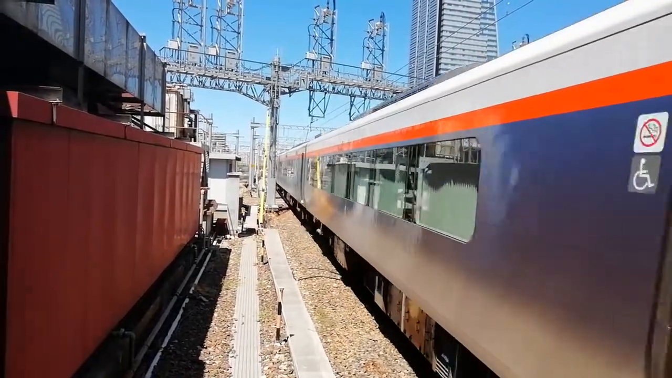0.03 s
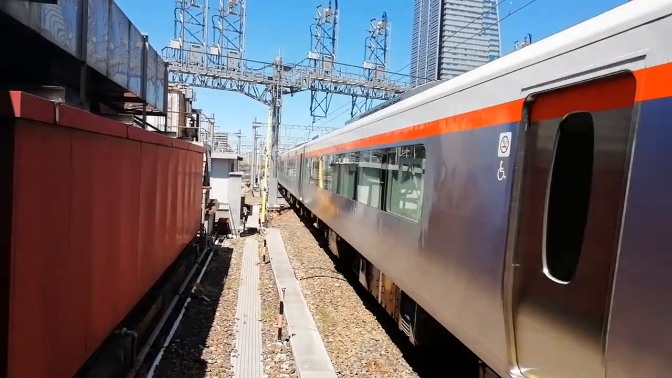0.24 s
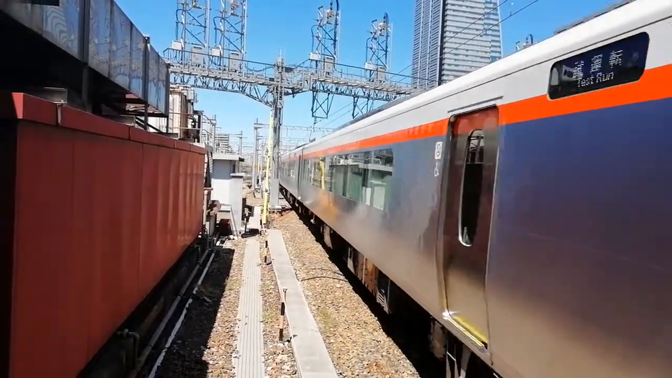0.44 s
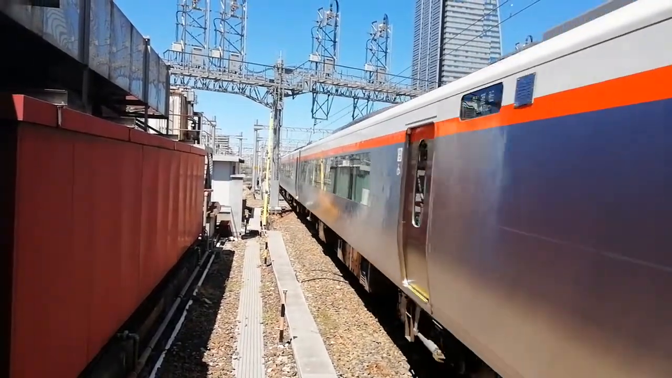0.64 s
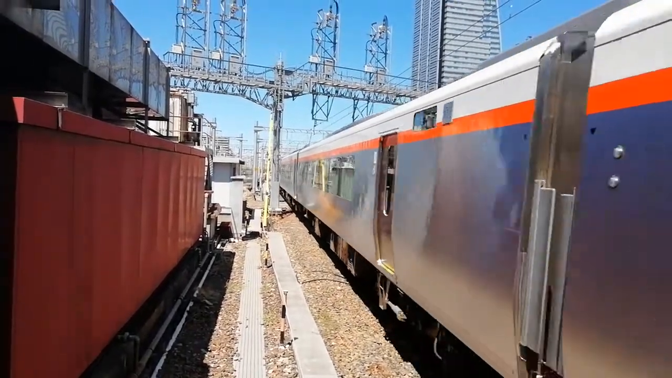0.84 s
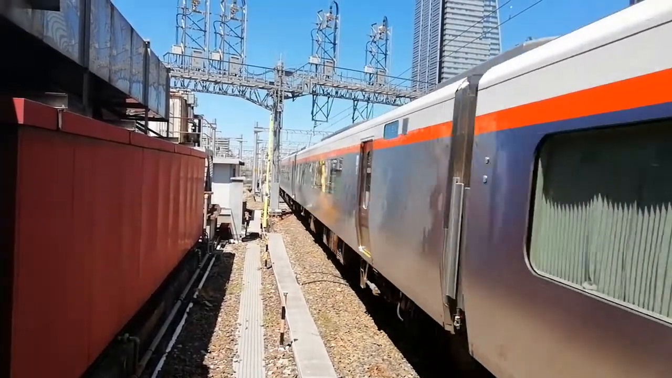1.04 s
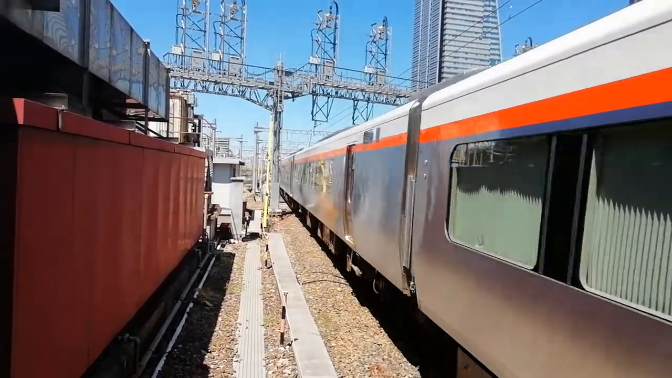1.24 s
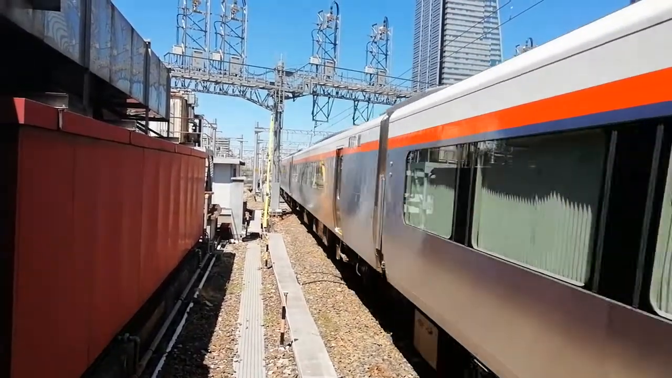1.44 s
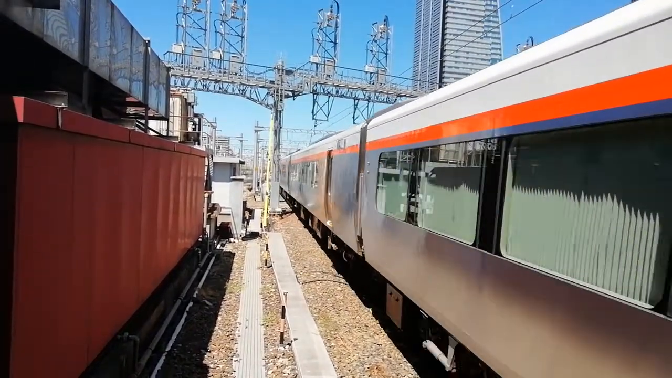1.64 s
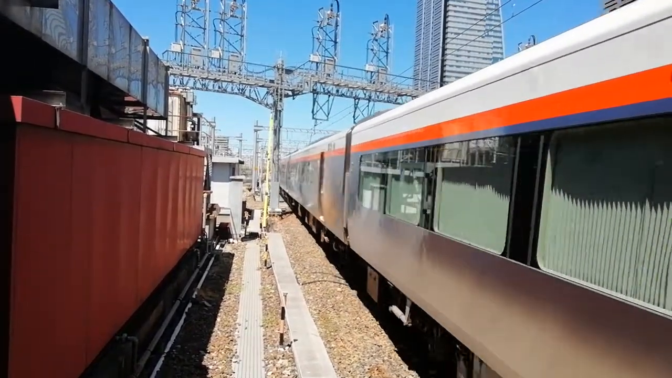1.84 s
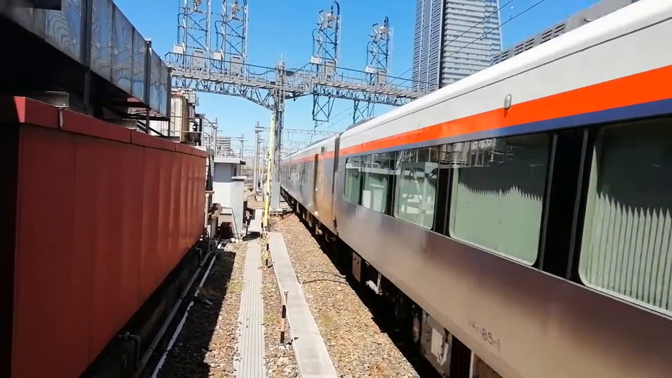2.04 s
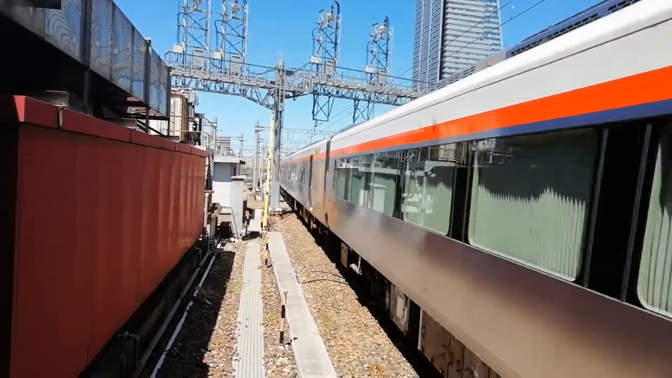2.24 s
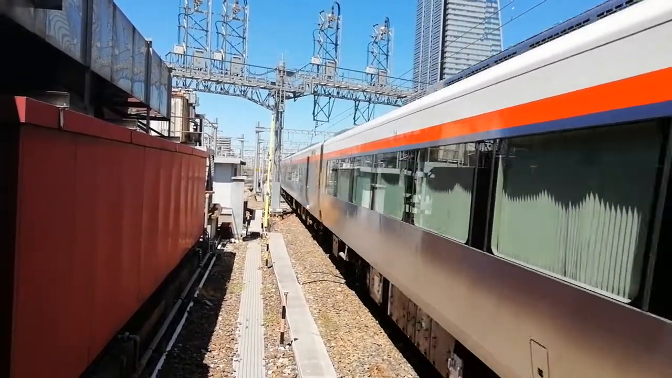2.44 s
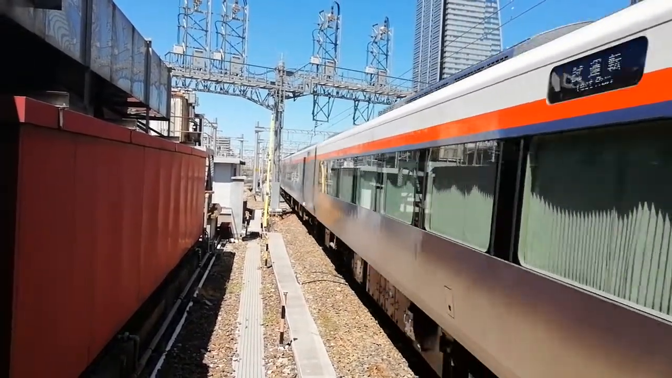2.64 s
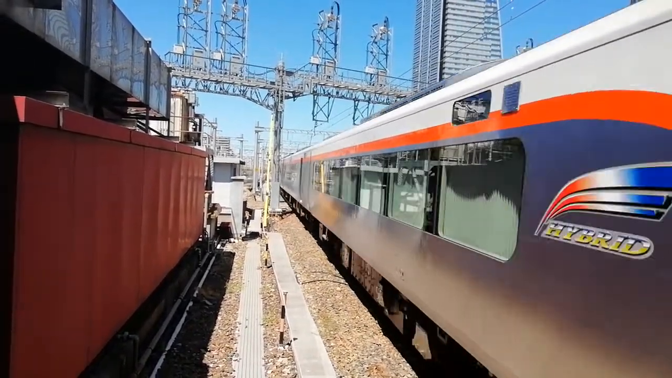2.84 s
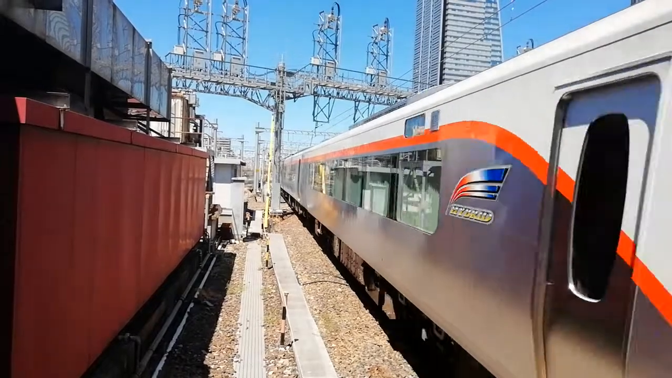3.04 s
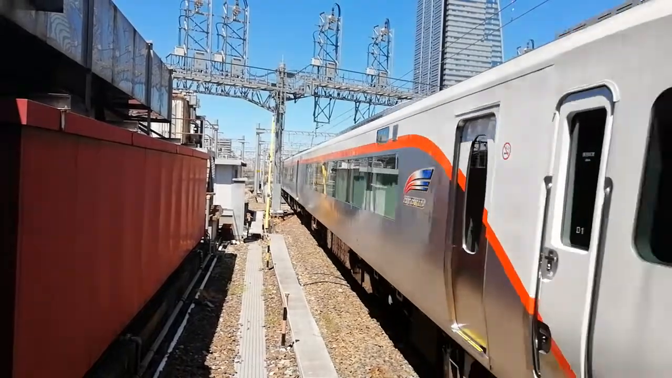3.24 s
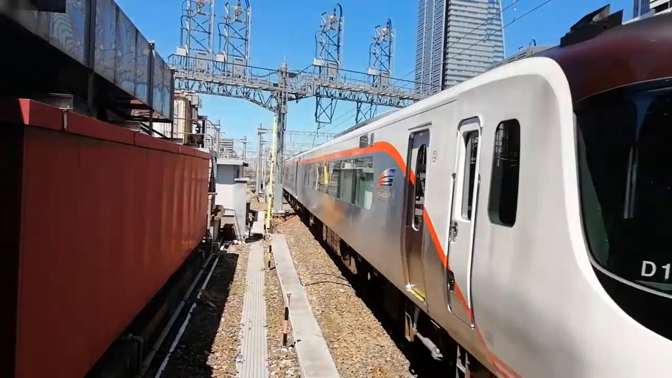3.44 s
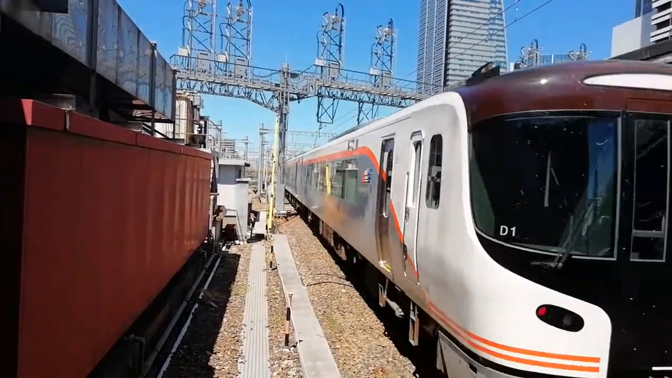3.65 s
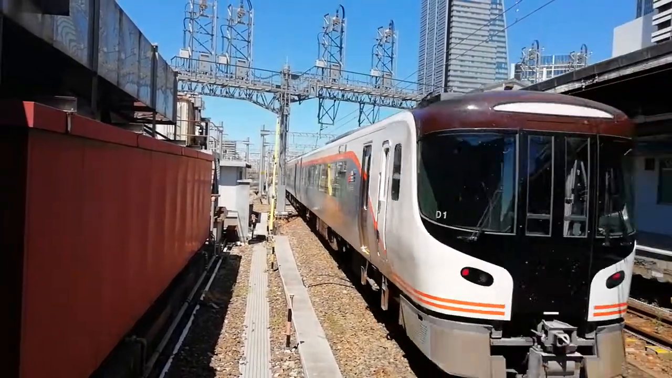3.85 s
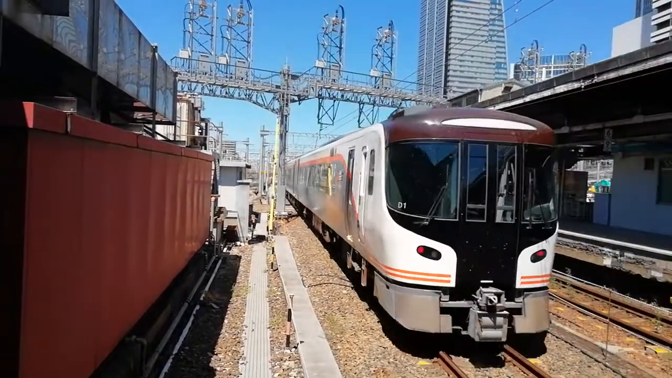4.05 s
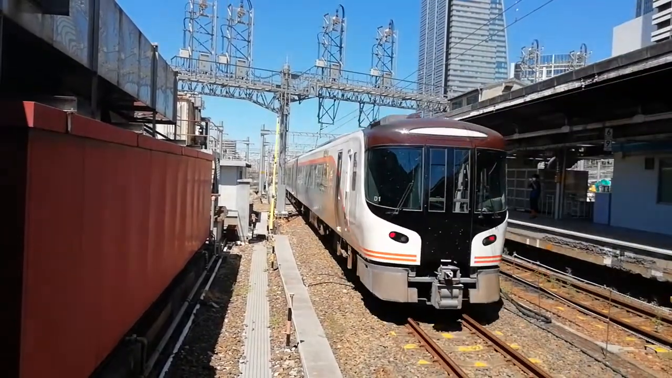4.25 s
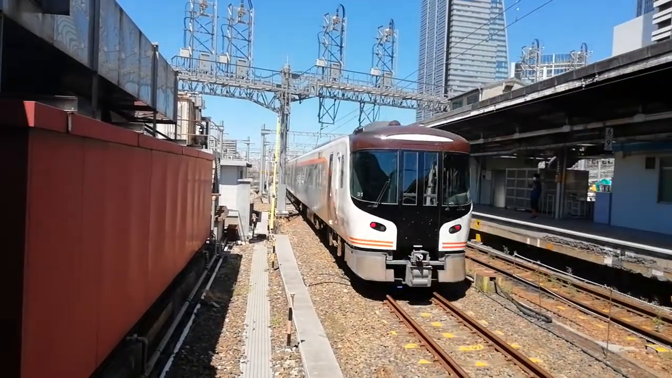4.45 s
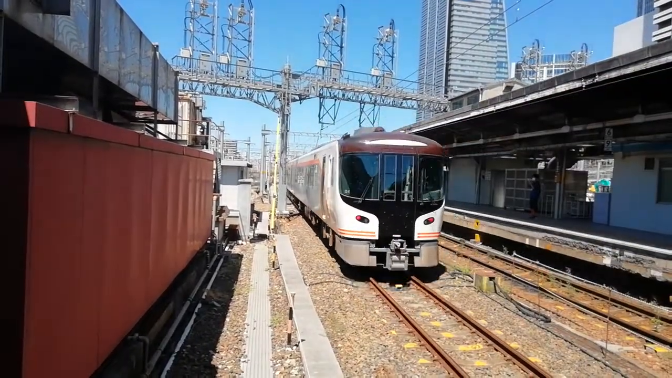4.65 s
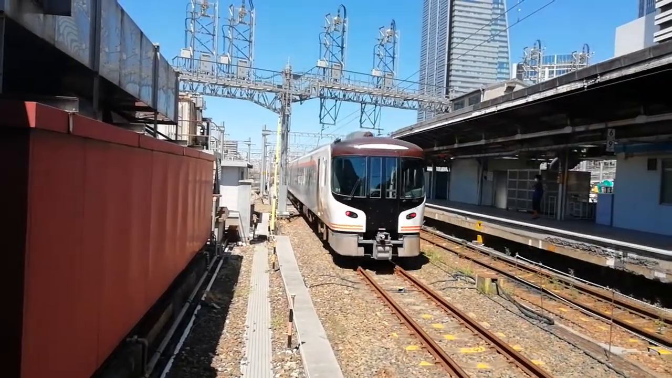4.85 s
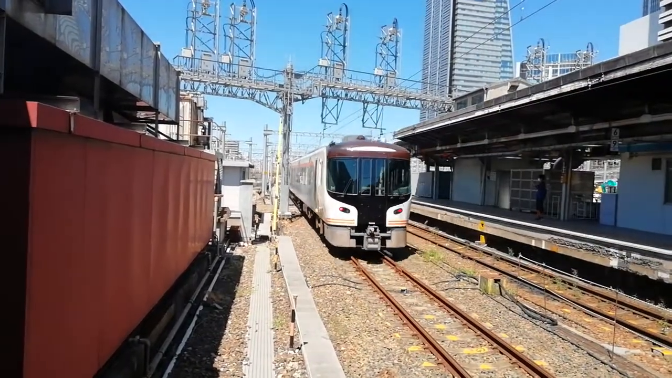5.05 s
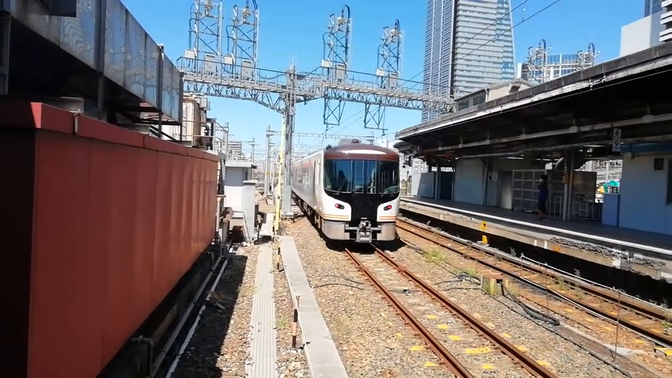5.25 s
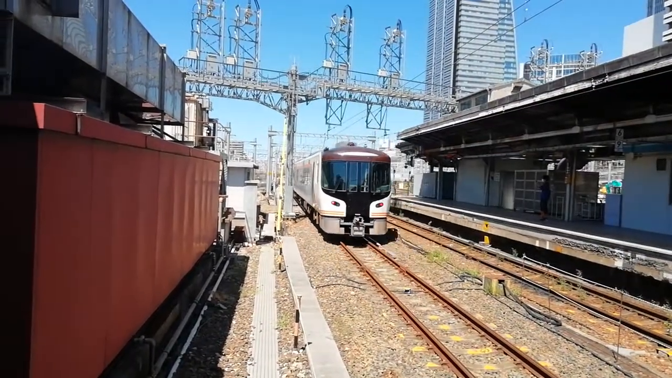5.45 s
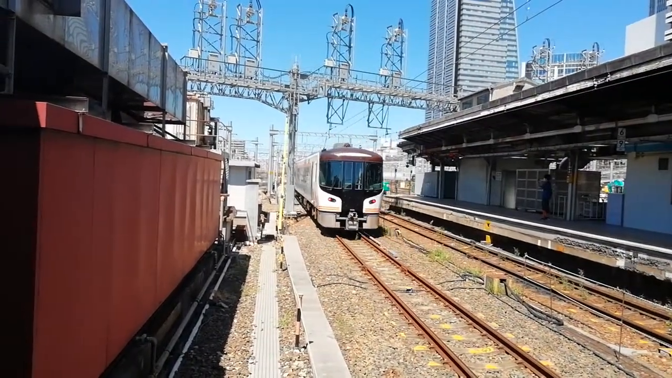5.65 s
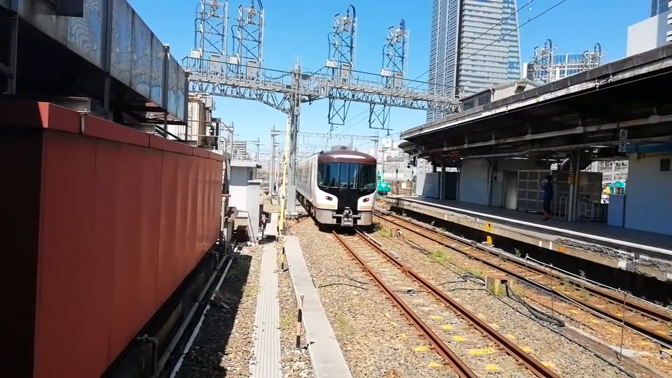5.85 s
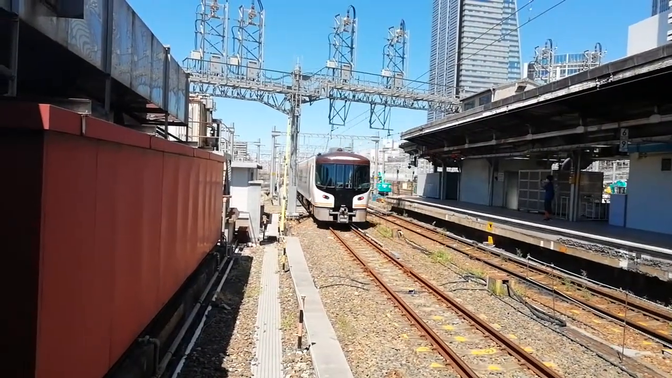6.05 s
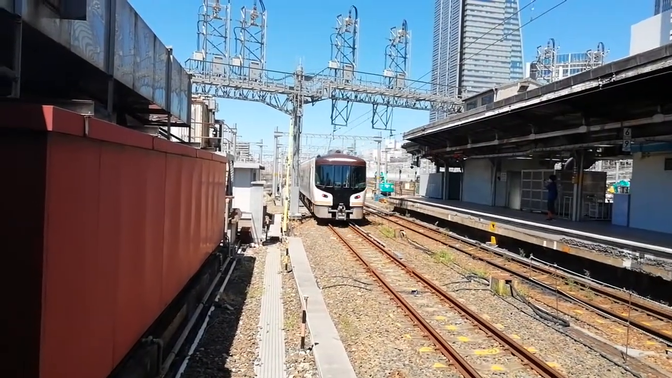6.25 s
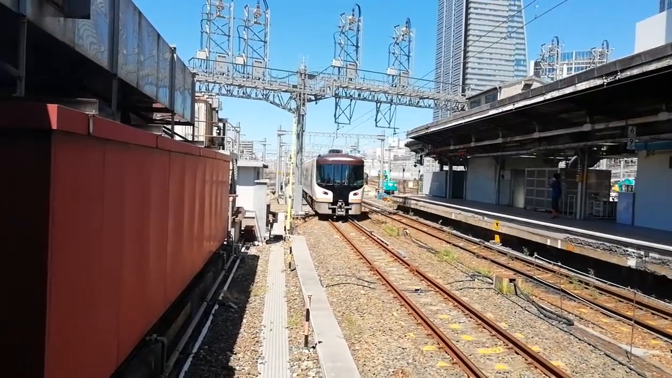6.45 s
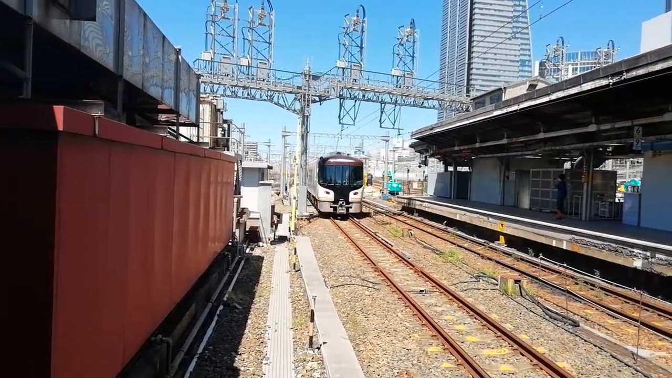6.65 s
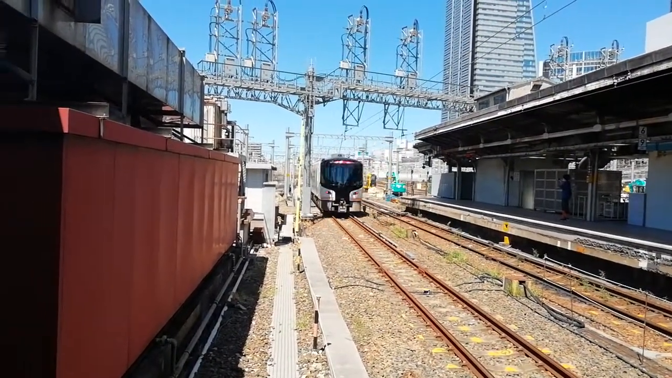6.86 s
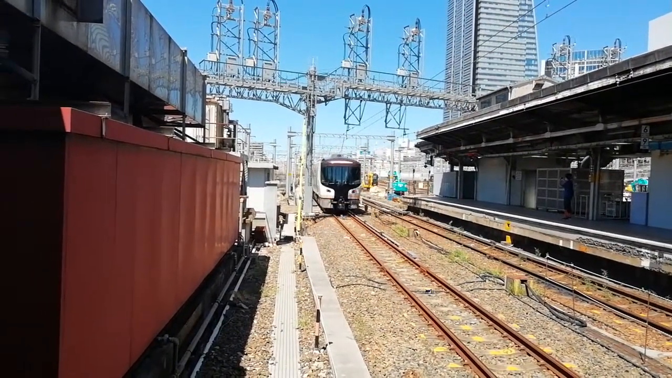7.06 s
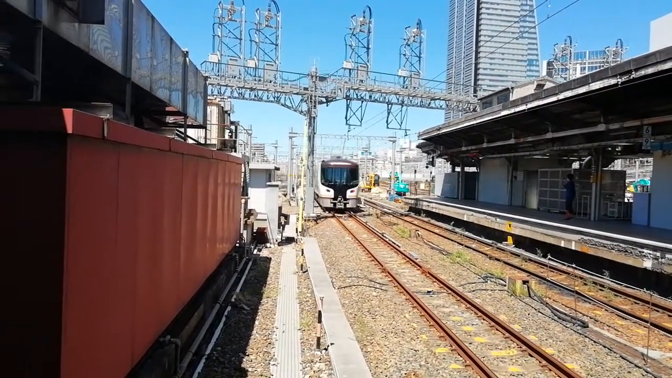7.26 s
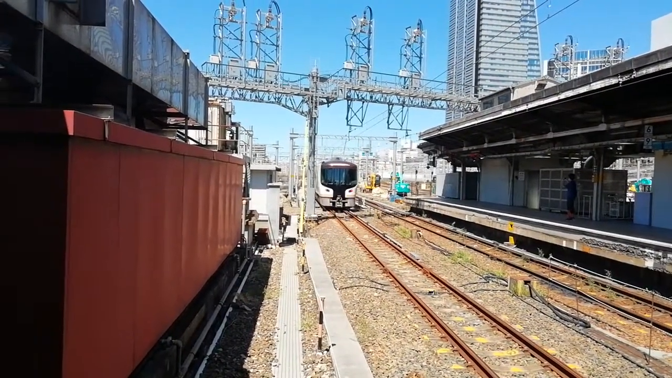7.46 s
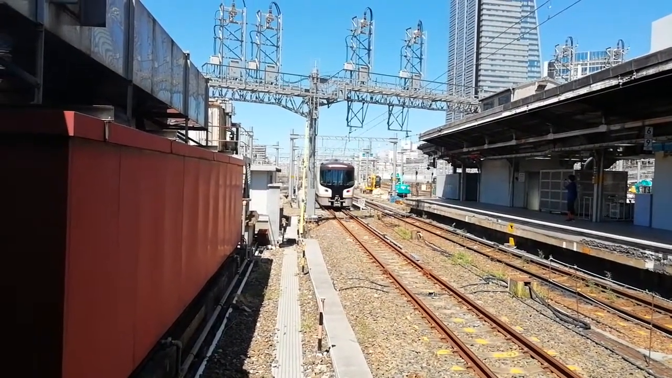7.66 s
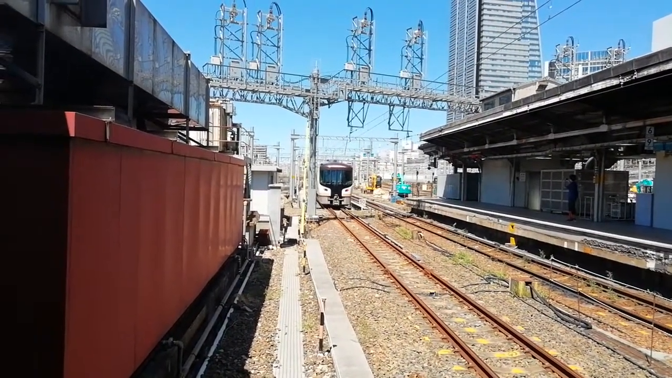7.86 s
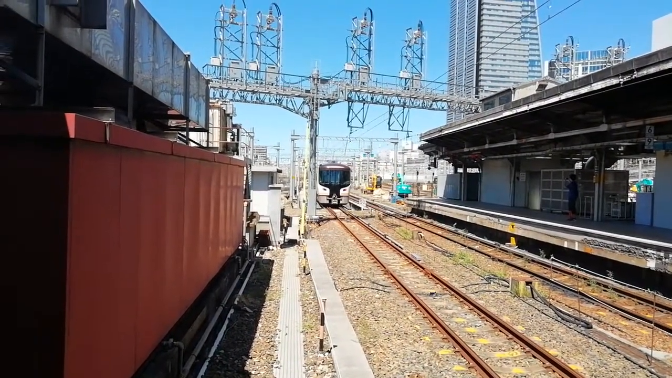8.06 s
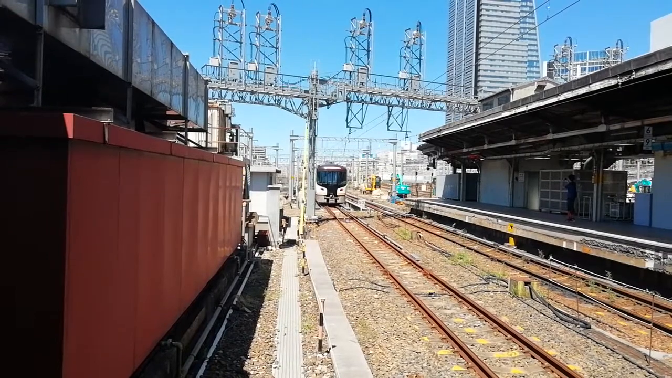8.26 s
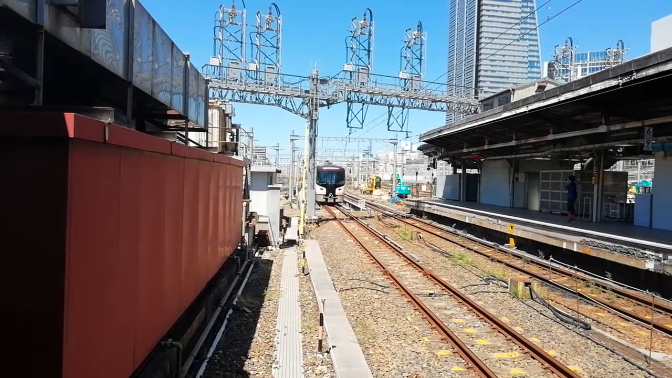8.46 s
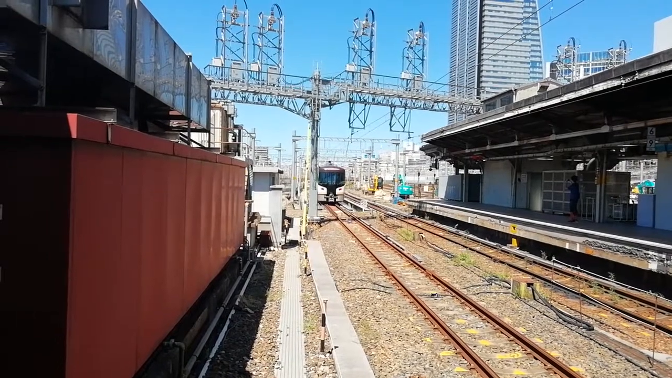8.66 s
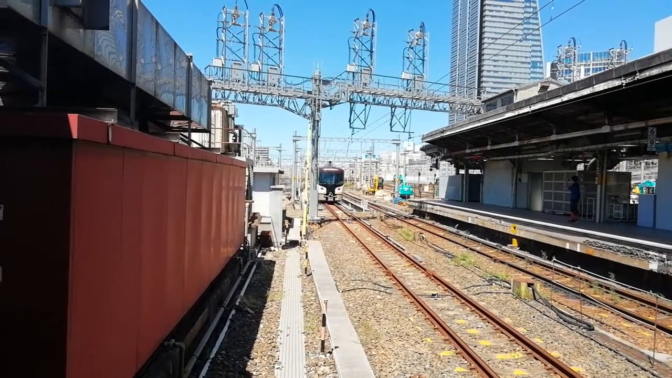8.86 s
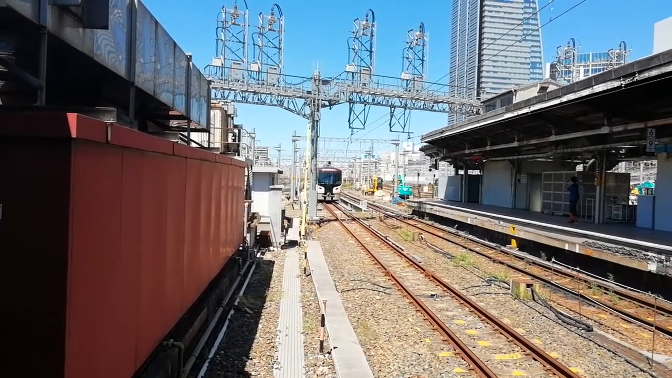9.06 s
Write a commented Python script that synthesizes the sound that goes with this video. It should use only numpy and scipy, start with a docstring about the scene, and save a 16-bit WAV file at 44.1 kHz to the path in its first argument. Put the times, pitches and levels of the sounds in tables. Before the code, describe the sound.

Beside an open-air station track, a departing train is already alongside: deep diesel drone, bright hissing outlets, rushing air, rolling wheels and a faint electric whine swell and shift. It then draws away, the hiss fading fastest. Knocks clank softly, later a distant puff and thin squeal sound, and engines pick up slightly far off. Close handheld stereo microphones, slightly coloured treble.

```python
"""The drone of a diesel hybrid railcar is heard first, as it leaves a station close by and draws away.
Its engines are sums of steady tones and throbbing noise; the fans, air, wheels and whine are shaped noise.
Each part swells as it goes by. Rail knocks, a puff of air and a thin wheel squeal (a sine) follow.
Distant traffic and the hums of the station stay behind. Two small microphone ports colour the sound."""
import sys
import numpy as np
from scipy import signal
from scipy.fft import rfft, irfft, next_fast_len
from scipy.io import wavfile
from scipy.ndimage import map_coordinates

SR = 44100
rng = np.random.default_rng(int(sys.argv[2]) if len(sys.argv) > 2 else 0)


def log_audio(samples):
    """Write samples as a 16-bit WAV file to the path given in sys.argv[1]."""
    # one column per channel
    frames = np.atleast_2d(samples).T
    # limit to full scale, then quantise
    limited = np.clip(frames, -1, 1)
    pcm = np.round(limited * 32767).astype(np.int16)
    wavfile.write(sys.argv[1], SR, pcm)


N = 401751
T = np.arange(N) / SR   # time of every sample, seconds
SIZE = next_fast_len(N)
FREQS = np.maximum(np.fft.rfftfreq(SIZE, 1 / SR), 1)   # Hz

SPEED_M_PER_S = 8.3
LAST_BOGIE_S = 3.05   # the underfloor gear has gone by
LAST_CAR_S, SPREAD_M = 3.56, 11.27   # the train starts to fade; length of train heard at once
ENGINE_DISTANCE_M = 2.26   # from the listener when abreast


# Engine firing rate, bent by the Doppler shift going by and picking up far off: (time [s], rate [Hz])
FIRING_RATE = [(0, 80.65), (1.9, 81.13), (2.85, 81.94), (3.45, 79.8), (4.4, 79.9), (5.8, 79.06),
               (7.6, 79.57), (8.3, 80.9), (9.11, 83.8)]
# The exhaust's firing tone, as the engines' drones add and cancel: (time [s], level before trim [dB])
FIRING_TONE = [(0.0, -27.5), (0.6, -21.5), (1.0, -23), (1.6, -19.5), (2.35, -28.5), (2.62, -29.5),
               (2.7, -22.5), (3.42, -17.5), (4.0, -28.5), (4.3, -42), (4.45, -33), (4.55, -36),
               (4.68, -27.5), (4.76, -25), (4.87, -39.5), (6.01, -36), (7.43, -38), (7.48, -41.5),
               (8.01, -51), (8.16, -44), (9.11, -41.5)]
# The tone one octave higher: (time [s], level before trim [dB])
FIRING_OCTAVE = [(0.0, -34), (0.11, -26.5), (0.18, -33), (0.35, -29), (0.56, -50), (0.84, -28), (0.95, -39),
                 (1.03, -31), (1.36, -25), (1.58, -25), (1.63, -33), (1.83, -20.5), (1.95, -21.5),
                 (2.12, -29), (2.17, -41), (2.24, -28.5), (2.35, -31.5), (2.72, -17.5), (3.45, -23.5),
                 (3.68, -34.5), (3.81, -31.5), (4.45, -39.5), (5.6, -55.5), (6.0, -35), (6.28, -36),
                 (6.6, -48.5), (7.4, -42), (7.9, -51.5)]
# Stronger tones of the engine and its geared helpers:
# (multiple of the firing rate, level against the engine level [dB])
ENGINE_ORDERS = [(3 / 2, -12.5), (2.2, -14), (7 / 2, -17), (5.1, -17.5)]
# Spectrum shape of the engine rumble: (frequency [Hz], relative level per Hz [dB])
RUMBLE_SPECTRUM = [(20, -28), (45, -18), (65, -2.5), (105, 7.5), (140, 4), (190, 5.5), (240, 2.5),
                   (285, -5.5), (335, -6.5), (450, -12.5), (900, -31)]


def engines(tone_db=0.34, octave_db=-0.7, growl_db=-4.0, rumble_db=-1.0, throb=0.3, lope=0.079,
            waver_db=0.76, order_waver_db=2, lag_ms=0.23):
    """Firing tone and octave, the growl of unequal cylinders, and a rumble that throbs with each firing."""
    firing_hz, = in_time(FIRING_RATE)
    first_db, = in_time(FIRING_TONE)
    second_db, = in_time(FIRING_OCTAVE)
    phase = 2 * np.pi * np.cumsum(firing_hz) / SR

    # while the cars are alongside on the right, their sound reaches the left port later
    lag = 2 * np.pi * firing_hz * lag_ms / 1000 * swell(1.5, 1.6)
    heard = phase - lag * np.array([[1], [0]])

    tone = from_db(first_db + tone_db + waver_db * drift(20)) * np.cos(heard)
    octave_level = from_db(second_db + octave_db + waver_db * drift(18))
    octave = octave_level * np.cos(2 * heard + 0.38 * drift(1.93))
    # uneven once per crank turn, which is three firings
    unevenness = 1 + lope * drift(3.1) * np.cos(phase / 3 + drift(1.96))
    drone = (tone - octave) * unevenness

    orders = sum(from_db(db + order_waver_db * drift(4)) * np.cos(multiple * heard + drift(2.5))
                 for multiple, db in ENGINE_ORDERS)
    rumble = from_db(rumble_db) * broad_noise(RUMBLE_SPECTRUM, flutter_db=1.5, rate=14)
    rumble = rumble * (1 + throb * np.cos(phase))
    block = np.sqrt(2) * orders + from_db(growl_db) * growl(phase) + rumble
    return np.sqrt(2) * drone + engine_level() * block


def growl(phase, count=30, step=10):
    """Six unequal cylinders repeat every sixth firing: close tones that beat, like several similar engines."""
    sixths = np.arange(count) + 7
    gains = from_db(np.interp(sixths * FIRING_RATE[0][1] / 6, FREQS, over_hz(RUMBLE_SPECTRUM)))
    # computed at every tenth sample; whole multiples of the firing rate are left out
    lines = sum(gain * drift(3)[::step] * np.cos(k / 6 * phase[::step] + drift(2)[::step])
                for k, gain in zip(sixths, gains) if k % 6)
    return rms_one(signal.resample_poly(lines, step, 1)[:N])


# Engines going by: (time [s], level before the layer trims [dB])
ENGINES_ABREAST = [(0.15, -37.5), (1.55, -29.5), (2.87, -29)]


def engine_level(train_db=-44.0, fall=0.17):
    """Each engine swells as it goes by, over the rumble of the whole train."""
    near = [from_db(db) * passing(s, ENGINE_DISTANCE_M) for s, db in ENGINES_ABREAST]
    return together(near + [from_db(train_db) * receding(fall)])


# Resonances of the whole train's fan roar, with a steady low auxiliary tone at 282.5 Hz: # (frequency [Hz],
# width [Hz], relative level [dB])
TRAIN_ROAR_MODES = [(282.5, 16, -1), (438, 49, 4), (472, 21, 0.5)]
# Fan outlets going by: (time [s], half length [s], frequency [Hz], width [Hz], level [dB])
FAN_OUTLETS = [(1.3, 0.26, 463, 70, -38), (2.362, 0.14, 420, 27.78, -29), (2.379, 0.32, 483, 80, -30.5),
               (3.24, 0.13, 452, 64.81, -31.5)]
# Tones and resonances heard only in front of the fan grille:
# (frequency [Hz], width [Hz], level before the left-right balance [dB])
GRILLE_TONES = [(600, 17, -40.5), (704, 12, -46), (600, 150, -38), (1640, 430, -42.5), (2400, 68, -49),
                (2600, 670, -44.5)]


def fans(train_db=-39.5, fall=1.7, grille_s=2.12, grille_half_s=0.54, lag_ms=0.71):
    """Cooling air roars in its housings; each outlet has its own pitch and the open grille adds brighter tones."""
    housing = rms_one(resonances(TRAIN_ROAR_MODES))
    # close by the sound comes from the right, far off from all round
    abreast = swell(grille_s, 1.5)
    roar = np.sqrt(abreast) * noise(housing, lag_ms) + 0.9 * np.sqrt(1 - abreast) * noise(housing)
    outlets = sum(from_db(db) * swell(s, half) * doppler(noise(resonance(hz, width), lag_ms), s)
                  for s, half, hz, width, db in FAN_OUTLETS)
    grille = swell(grille_s, grille_half_s) * doppler(noise(resonances(GRILLE_TONES), lag_ms), grille_s)
    return from_db(train_db) * receding(fall) * roar + outlets + grille * from_db([[-3], [1]])


# Spectrum shape of the rolling wheels: (frequency [Hz], relative level per Hz [dB])
ROLL_SPECTRUM = [(200, -2.5), (400, 5), (560, 0.5), (700, -2), (850, -1), (1050, -1), (1200, -0.5),
                 (1400, 2), (1750, -3.5), (2300, -9.5), (4000, -7.5), (9000, -37)]
# Spectrum shape of the air under the floor: (frequency [Hz], relative level per Hz [dB])
RUSH_SPECTRUM = [(900, -18), (1600, -15), (2200, -8.5), (2600, 0.5), (3700, 2), (5000, 2.5), (7000, -6.5),
                 (10000, -12.5), (15500, -26)]
# Whine of the power electronics:
# (frequency [Hz], width [Hz], level against the air rush, before trim [dB])
WHINE_TONES = [(2390, 44, -21), (4090, 60, -24)]


def running_gear(roll_db=-37, roll_fall=0.45, bogie_db=-43, bogie_s=2.6, rush_db=-34.0, rush_fall=0.87,
                 alongside_db=2.5, whine_db=4.0):
    """Wheels roll, swelling briefly with one bogie; air rushes under the floor and the electronics whine."""
    # a boost that eases away as the last bogie leaves
    gone = np.tanh(SPEED_M_PER_S * (T - LAST_BOGIE_S) / ENGINE_DISTANCE_M)
    beside = from_db(alongside_db * (1 - gone) / 2)

    train_wheels = from_db(roll_db) * np.sqrt(beside) * receding(roll_fall)
    wheels = together([train_wheels, from_db(bogie_db) * swell(bogie_s, 0.092)])
    roll = wheels * broad_noise(ROLL_SPECTRUM, flutter_db=0.6, rate=16)
    rush = broad_noise(RUSH_SPECTRUM, flutter_db=0.7, rate=28)
    whine = from_db(whine_db + 1.2 * drift(9)) * noise(resonances(WHINE_TONES))
    return roll + from_db(rush_db) * beside * receding(rush_fall) * (rush + whine)


# Hissing air outlets going by: (time [s], half length [s], level [dB])
HISS_OUTLETS = [(0.0, 0.38, -24), (0.768, 0.52, -25.5), (2.45, 0.72, -33), (4.3, 0.31, -40.5)]
# Spectrum shape of the hiss: (frequency [Hz], relative level per Hz [dB])
HISS_SPECTRUM = [(2500, -12), (5000, -5), (6500, -1), (8000, 0.5), (11500, 2), (15500, -1.5)]


def air_hiss(train_db=-36.0, fall=1.39):
    """Turbulent air hisses as outlets go by; the hiss of the whole train fades quickly with distance."""
    near = [from_db(db) * swell(s, half) for s, half, db in HISS_OUTLETS]
    level = together(near + [from_db(train_db) * receding(fall)])
    return level * broad_noise(HISS_SPECTRUM, flutter_db=0.82, rate=38)


# Swells of air: (time [s], half length [s], frequency [Hz], width [Hz], level [dB])
AIR_RUSHES = [(2.599, 0.094, 12700, 8300, -29.5), (2.78, 0.31, 14000, 7000, -32.5),
              (2.62, 0.26, 3400, 1000, -37.5), (2.65, .3, 1440, 290, -48), (4.55, 0.75, 4000, 1600, -40),
              (4.4, 0.6, 1350, 320, -46), (8.3, 0.35, 2900, 1300, -48)]


def air_swells():
    """Bands of air noise swell past with the cars and in their wake; far off there is a faint rush."""
    return sum(from_db(db) * swell(s, half) * noise(resonance(hz, width))
               for s, half, hz, width, db in AIR_RUSHES)


# The whine flares up: (time [s], half length [s], level on the right [dB])
FLARES = [(1.84, 0.027, -39), (2.19, 0.05, -41.5), (2.5, .2, -44)]


def whine_flares(hz=2440, width_hz=42, left_db=-4):
    """The whine, a narrow band of noise, rings out briefly while the train is close."""
    level = sum(from_db(db) * swell(s, half) for s, half, db in FLARES)
    return level * noise(resonance(hz, width_hz), lag_ms=0.66) * from_db([[left_db], [0]])


# Low thrums: (time [s], half length [s], level [dB])
LOW_THRUMS = [(1.41, 0.041, -25), (1.72, 0.094, -28.5), (8.33, 0.035, -41.5), (8.75, 0.3, -44.5)]


def thrums(hz=194, width_hz=24):
    """A low thrum wells up as an engine goes by, and again as the engines pick up in the distance."""
    level = sum(from_db(db) * swell(s, half) for s, half, db in LOW_THRUMS)
    return level * noise(resonance(hz, width_hz))


# Wheel knocks on the rail, before the strike's shape and the clank's resonances:
# (time [s], thud level [dB], clank level [dB])
RAIL_KNOCKS = [(4.45, -32, -33), (4.51, -46, -35), (4.71, -34, -30.5), (7.40, -32, -55)]


def knocks(rise_s=0.0047, ring_s=0.049):
    """A wheel strikes a gap in the rail: a dull thud with a short clank."""
    thud, clank = np.zeros((2, N))
    for s, thud_db, clank_db in RAIL_KNOCKS:
        blow = strike(s, rise_s, ring_s)
        thud += from_db(thud_db) * blow
        clank += from_db(clank_db) * blow
    clank_modes = [(880, 270, -6.5), (1460, 340, -9.5)]   # (Hz, width Hz, dB)
    return thud * noise(resonance(130, 80)) + clank * noise(resonances(clank_modes))


def air_puff(s=7.632, rise_s=.008, fall_s=.036, hz=3850, width_hz=1400, db=-32):
    """Far off, a short puff of air starts sharply and dies away."""
    return from_db(db) * strike(s, rise_s, fall_s) * noise(resonance(hz, width_hz))


# A far wheel sings thinly on the curve: (time [s], length [s], peak level on the right before waver [dB])
WHEEL_SQUEALS = [(6.38, .17, -52), (7.61, .53, -49.3), (8.33, .05, -49.5)]


def squeal(hz=3225, waver_hz=4, waver_db=1.4, left_db=-8, attack_s=.04, release_s=.09):
    """One wheel mode, kept ringing unevenly while the flange rubs on the rail."""
    level = 0
    for s, length, db in WHEEL_SQUEALS:
        attack = np.clip((T - s) / attack_s, 0, 1)
        release = np.exp(-np.maximum(T - s - length, 0) / release_s)
        level = level + from_db(db) * attack * release
    phase = 2 * np.pi * np.cumsum(hz + waver_hz * drift(12)) / SR
    return level * from_db(waver_db * drift(14)) * np.sin(phase) * from_db([[left_db], [0]])


# Steady hums around the station: (frequency [Hz], width [Hz], level [dB], left minus right [dB])
STATION_HUMS = [(194.8, 5.3, -49.5, -3), (395, 16, -53, -3.5), (586, 24, -59, -0.5),
                (1035, 37, -56.5, -1.5), (1379, 9.2, -60, -6), (1945, 31, -59.5, 1)]
# Spectrum shape of distant town traffic: (frequency [Hz], relative level per Hz [dB])
TOWN_SPECTRUM = [(20, -25), (58, 13), (110, -18), (200, -0.5), (330, -9), (750, -11), (3000, -22.5),
                 (15500, -34)]


def station(town_db=-48):
    """Distant traffic and the faint steady hums of the surroundings, all made of shaped noise."""
    power = sum((from_db(db + pan_db / 2 * np.array([[1], [-1]])) * resonance(hz, width)) ** 2
                for hz, width, db, pan_db in STATION_HUMS)
    town = from_db(town_db) * broad_noise(TOWN_SPECTRUM, flutter_db=2.0, rate=7.2)
    return noise(np.sqrt(power)) + town


def receding(fall):
    """Gain of the whole train: steady while cars are alongside, then a power of the last car's distance."""
    gone_m = SPEED_M_PER_S * np.maximum(T - LAST_CAR_S, 0)
    return np.hypot(1, gone_m / SPREAD_M) ** -fall


def passing(s, distance_m):
    """Gain of a single source going by, inversely as its distance; 1 when abreast."""
    return 1 / np.hypot(1, SPEED_M_PER_S * (T - s) / distance_m)


def doppler(x, s):
    """A sound carried past the listener: delayed by its distance, so its pitch sags as it goes by."""
    path_m = np.hypot(ENGINE_DISTANCE_M, SPEED_M_PER_S * (T - s))
    return np.array([np.interp(T - path_m / 343, T, channel) for channel in x])   # sound goes 343 m/s


def swell(s, half_length):
    """Bell-shaped rise and fall around a moment."""
    return np.exp(-.5 * ((T - s) / half_length) ** 2)


def strike(s, rise_s, fall_s):
    """A quick rise from silence, then a dying away."""
    age = np.maximum(T - s, 0)
    return (1 - np.exp(-age / rise_s)) * np.exp(-age / fall_s)


def together(gains):
    """Unrelated sources add in power."""
    return np.sqrt(sum(gain ** 2 for gain in gains))


def from_db(db):
    """Decibels to gain."""
    return 10 ** (np.asarray(db) / 20)


def rms_one(x):
    """Scale to unit power."""
    return x / np.sqrt(np.mean(x ** 2) + 1e-20)


def in_time(rows):
    """Each column of a curve table at every sample."""
    s, *columns = np.transpose(rows)
    return [np.interp(T, s, column) for column in columns]


def over_hz(points):
    """A table joined by straight lines over log frequency."""
    hz, value = np.transpose(points)
    return np.interp(np.log(FREQS), np.log(hz), value)


def drift(rate):
    """Slow random wandering of spread 1, through `rate` random points a second."""
    knots = rng.standard_normal(4000)
    curve = map_coordinates(knots, [T[::100] * rate], order=3, mode="mirror")
    return rms_one(curve).repeat(100)[:N]


def resonance(hz, width_hz):
    """Gain of a steep-sided resonance, of unit power."""
    detuning = (FREQS ** 2 - hz ** 2) / (FREQS * width_hz * 1.5)
    return rms_one(1 / (1 + detuning ** 2))


def resonances(modes):
    """Gain of several resonances whose powers add."""
    return together([from_db(db) * resonance(hz, width) for hz, width, db in modes])


# Likeness of the two channels: (frequency [Hz], correlation [-1 to 1])
CHANNEL_LIKENESS = [(100, 0.98), (220, 0.91), (330, 0.8), (450, -0.035), (600, -0.64), (900, 0.19),
                    (1400, 0.14), (2000, -0.083), (2500, -0.38), (3500, 0.27), (4400, -0.3), (5400, 0.44),
                    (6400, -0.35), (7400, 0.26), (8500, -0.13), (12000, 0.073)]


def noise(gain, lag_ms=0):
    """Stereo noise of a given spectrum, alike in both ports in the bass; a source on the right lags on the left."""
    mid, side = rfft(rng.standard_normal((2, SIZE)))
    alike = np.clip(over_hz(CHANNEL_LIKENESS), -.995, .995)
    pair = np.sqrt((1 + alike) / 2) * mid + np.sqrt((1 - alike) / 2) * side * [[1], [-1]]
    if lag_ms:
        delay = np.exp(-2j * np.pi * FREQS * lag_ms / 1000 * [[1], [0]])   # left channel only
        pair = .5 * pair + np.sqrt(3 / 4) * mid * delay
    return irfft(pair * gain, SIZE)[:, :N]


def broad_noise(spectrum, flutter_db, rate):
    """Turbulent noise, of unit power before its level flutters a little."""
    return noise(rms_one(from_db(over_hz(spectrum)))) * from_db(flutter_db * drift(rate))


def scene():
    """The train and the station around it."""
    train = engines() + fans() + running_gear() + air_hiss() + air_swells()
    details = whine_flares() + thrums() + knocks() + air_puff() + squeal()
    return train + details + station()


# Microphone port responses, left then right: (frequency [Hz], gain [dB])
LEFT_RESPONSE = [(300, 0), (450, -1), (800, 4), (1500, -0.5), (2200, 4.5), (3000, -3), (4100, -4),
                 (5200, -7.5), (7500, -3), (9400, 0.5), (10500, 0.5), (11600, 3), (12800, -4),
                 (15500, -15.5)]
RIGHT_RESPONSE = [(300, 0), (480, -0.5), (750, 2), (1500, 0.5), (2200, 6.5), (3000, 3.5), (4500, 2.5),
                  (5200, -0.5), (6200, 7), (7400, 9.5), (8000, 13.5), (9300, 7), (11200, -6.5),
                  (13200, -8.5), (15500, -19)]


def record(dry, cutoff_hz=15730):
    """Each microphone port has its own treble resonance; the top is cut steeply."""
    ports = from_db([over_hz(LEFT_RESPONSE), over_hz(RIGHT_RESPONSE)])
    low_pass = np.clip((cutoff_hz - FREQS) / 150 + .5, 0, 1)   # a slope 150 Hz wide
    return irfft(rfft(dry, SIZE) * ports * low_pass, SIZE)[:, :N]


dry = scene()
out = record(dry)
log_audio(out)
```